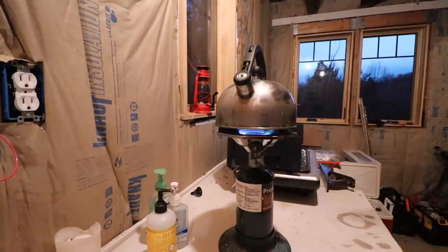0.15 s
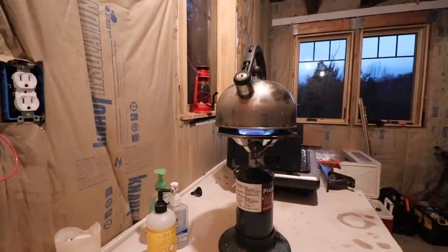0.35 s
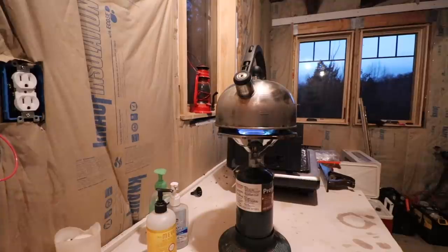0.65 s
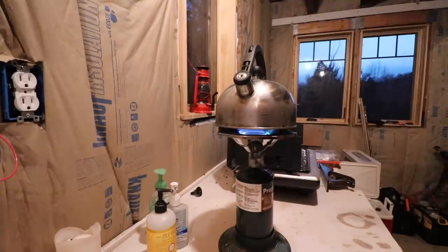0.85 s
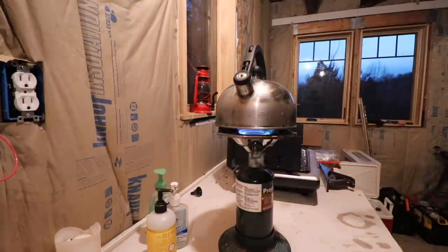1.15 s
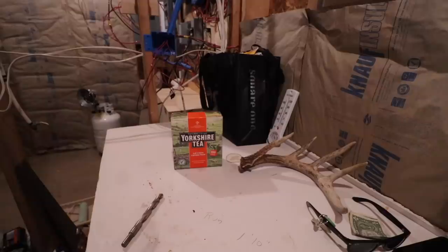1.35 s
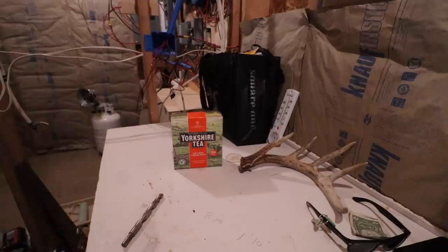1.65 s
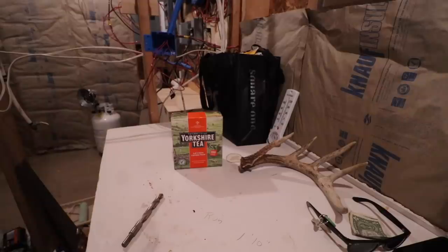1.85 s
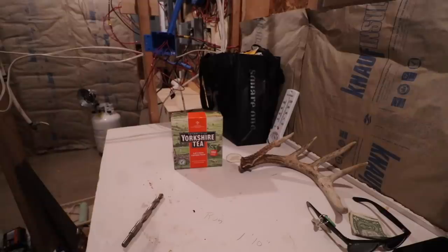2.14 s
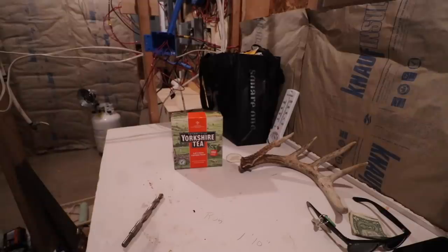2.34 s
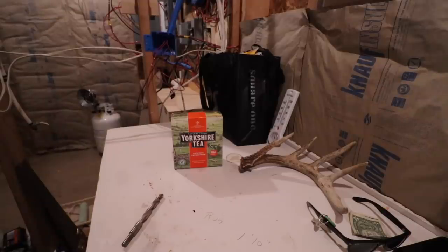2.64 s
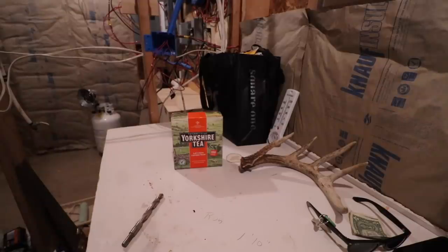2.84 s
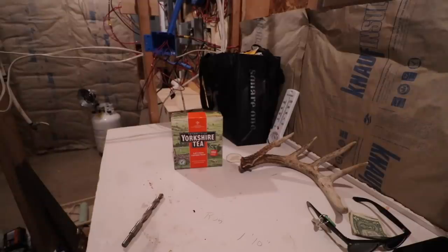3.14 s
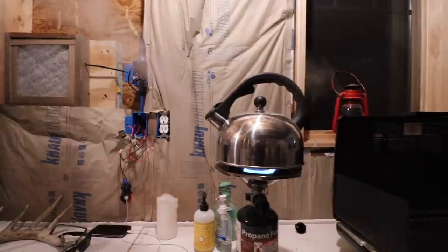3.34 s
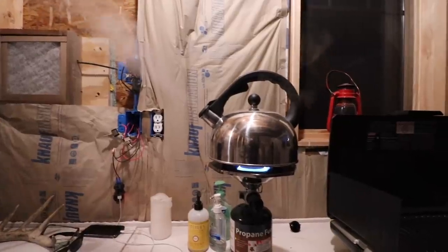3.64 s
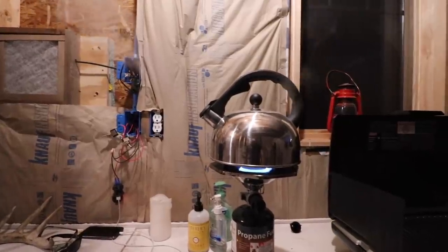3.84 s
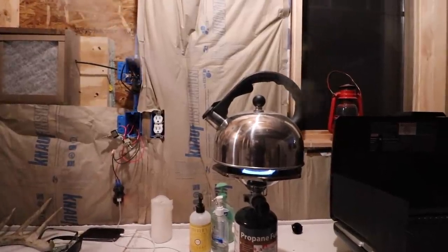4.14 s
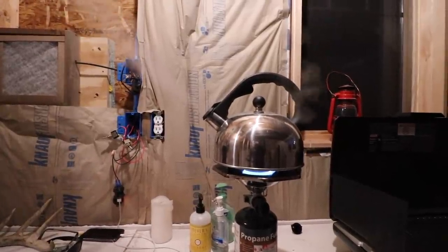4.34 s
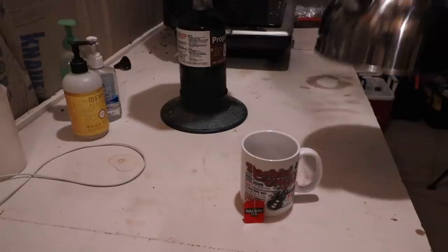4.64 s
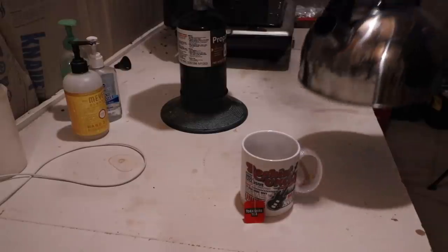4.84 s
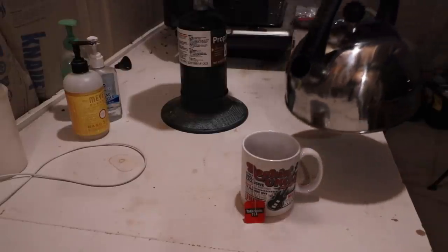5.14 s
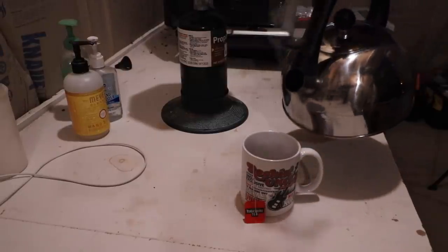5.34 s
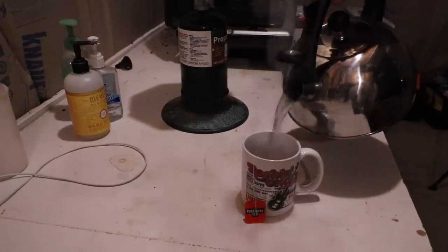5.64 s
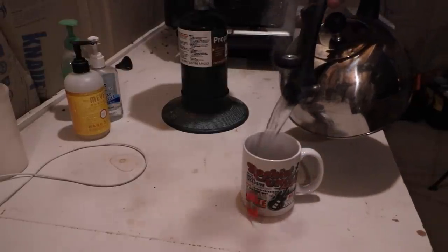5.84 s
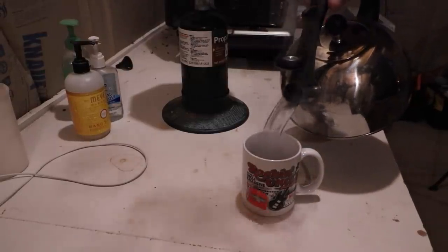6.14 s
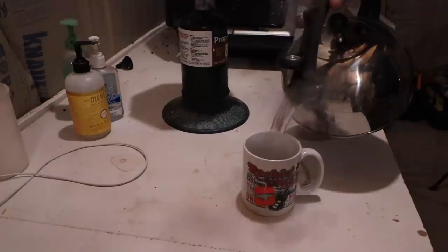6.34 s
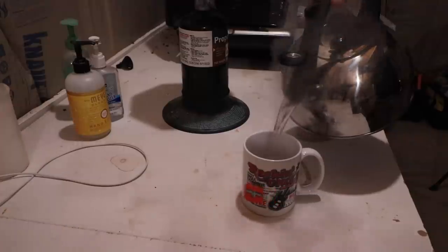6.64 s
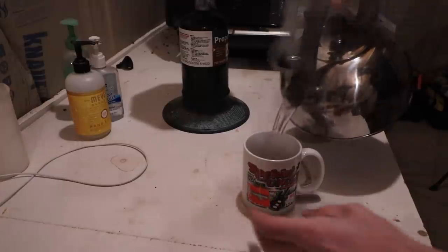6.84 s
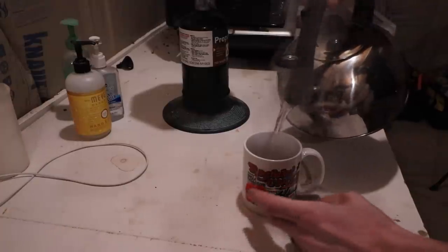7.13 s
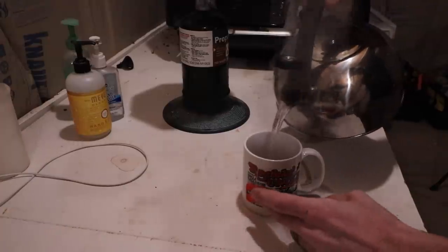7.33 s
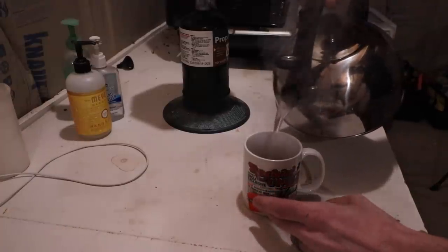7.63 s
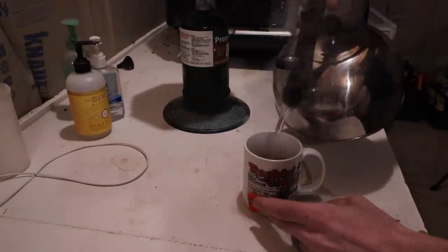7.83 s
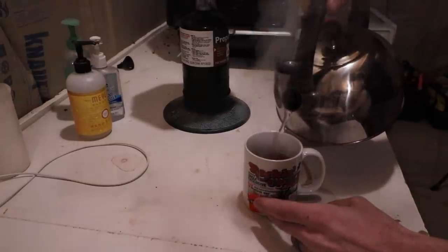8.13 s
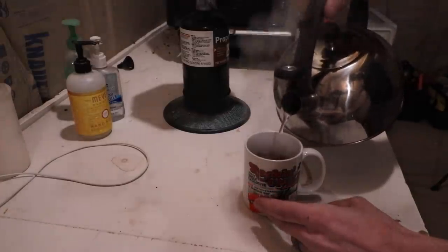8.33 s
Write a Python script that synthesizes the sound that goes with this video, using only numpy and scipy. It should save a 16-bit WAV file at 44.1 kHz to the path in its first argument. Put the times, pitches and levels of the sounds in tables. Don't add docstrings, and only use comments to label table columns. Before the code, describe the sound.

A gas camp burner roars under a steel kettle, the kettle whistles shrilly, then boiling water hisses and pours bubbling into a mug.

```python
import sys
import numpy as np
from scipy import signal
from scipy.fft import rfft, irfft, next_fast_len
from scipy.io import wavfile
from scipy.ndimage import uniform_filter1d, map_coordinates

SR = 44100
rng = np.random.default_rng(int(sys.argv[2]) if len(sys.argv) > 2 else 0)


def volts_from_decibels(level):
    exponent = np.asarray(level, float) / 20
    return 10 ** exponent


def log_audio(samples):
    frames = np.atleast_2d(samples).T
    limited = np.clip(frames, -1, 1)
    pcm = np.round(limited * 32767).astype(np.int16)
    wavfile.write(sys.argv[1], SR, pcm)


N = 373968
TIME = np.arange(N) / SR

CUTS = [
    1.325,
    3.333,
    4.692,
]

# pitch_hz, left-right likeness (0 to 1)
ALIKE = [
    [(100, 1), (700, 0.92), (1800, 0.4), (3000, 0.6), (5500, .36), (12000, 0.12)],
    [(100, 1), (700, 0.95), (1800, 0.52), (4000, 0.28), (12000, 0.17)],
    [(100, 0.998), (700, 0.98), (1900, 0.82), (3100, 0.44), (5300, 0.88), (10000, 0.42)],
    [(100, 0.65), (700, 0.68), (2050, 0.2), (3000, 0.5), (8000, 0.22), (14000, .6)],
]
# pitch_hz, left_minus_right_db
TILT = [
    [(60, -0.5), (180, 0), (550, -0.5), (1650, -1.5), (4970, -2), (15000, 1.5)],
    [(60, -2.5), (180, 0), (550, -0.5), (1650, -2), (4970, -8.5), (15000, 1)],
    [(60, 1), (180, -0.5), (550, 0.5), (1650, -2.5), (4970, 0), (15000, 5.5)],
    [(60, 1), (180, -1), (550, 1.5), (1650, -3.5), (4970, -0.5), (15000, -2.5)],
]
LAG_MS = [0.02, 0.19, 0.005, 0.043]
BASS_TWIST = [.16, .1, 0, .18]

BURNER_DB = [-39, -38, -47]
# pitch_hz, level_db (per Hz)
NEAR = [(15, -48), (25, -18), (119, 3), (323, 1.5), (434, -9.5), (922, -13), (1800, -22.5), (3100, -20.5),
        (6200, -21.5), (8800, -31), (10700, -46), (12000, -28), (13100, -38), (15000, -31), (15700, -52)]
# pitch_hz, width_hz, level_db
NEAR_PEAKS = [(505, 28, -9.5), (720, 66, -6.5), (880, 120, -8.5), (3750, 40, -12), (5330, 60, -11.5),
              (5540, 110, -13), (6600, 150, -29.5), (7370, 146, -18.5), (7800, 280, -16.5),
              (8200, 380, -16), (9750, 150, -18), (11660, 210, -23)]
# pitch_hz, level_db (per Hz)
ASIDE = [(15, -43), (25, -19.5), (122, -0.5), (260, 0.5), (470, -15.5), (900, -21.5), (1600, -24.5),
         (2800, -23), (5800, -28.5), (6600, -32.5), (9000, -30), (10900, -51.5), (13000, -44), (15300, -37),
         (15700, -44.5)]
# pitch_hz, width_hz, level_db
ASIDE_PEAKS = [(397, 12, -10), (566, 76, -3.5), (679, 114, -0.5), (890, 44, -8.5), (1313, 68, -15),
               (3360, 62, -22), (1200, 31, -10), (3886, 115, -12), (4454, 290, -16.5), (5150, 73, -18),
               (5510, 66, -16), (5820, 250, -17.5), (6820, 56, -22.5), (7180, 100, -22), (7840, 250, -14.5),
               (10200, 170, -26.5), (12020, 140, -23.5)]
# pitch_hz, level_db (per Hz)
BOIL = [(25, -43.5), (100, -20), (300, -26.5), (700, -13.5), (1700, -25.5), (4100, -18.5), (4500, -4.5),
        (4800, -4.5), (5200, -10), (6000, -20.5), (8000, -19.5), (10300, -27.5), (13000, -35),
        (13900, -48.5), (15700, -62)]
# pitch_hz, width_hz, level_db
BOIL_PEAKS = [(139, 23, -5), (230, 25, -2), (295.5, 37, -3), (487, 23, -8), (580, 23, -10.5),
              (716, 19, -5.5), (1300, 60, -11), (1440, 60, -12), (1900, 40, -11), (2210, 230, -12),
              (3770, 170, -9.5)]
# start_s, level_db, half_length_s
FLARE = (3.83, 5.1, 0.054)
# start_s, level_db, half_length_s, pitch_hz, width_hz
RUSTLE = (1.425, -53, .06, 2300, 1500)

# start_s, pitch_hz, jet_edge_db
WHISTLE = [(3.34, 4362, 3), (3.46, 4429, 1.5), (3.63, 4365, 2.5), (3.82, 4422, -1.5), (3.96, 4383, -1.5),
           (4.1, 4400, -1), (4.33, 4404, 0.5), (4.41, 4360, -2), (4.685, 4420, 3)]
# start_s, depth_db, jump_hz
FALTERS = [(3.427, 5.5, 11), (3.46, 6, 9.5), (3.482, 3.5, 1.5), (3.538, 3.5, 5.5), (3.675, 3.5, 3.5),
           (3.712, 3, 0.5), (3.748, 7, 16.5), (3.79, 1.5, 6), (3.817, 9, 16.5), (3.851, 1, -11.5),
           (3.925, 2.5, -5.5), (3.977, 4, 24), (4.006, 0.5, 0), (4.068, 5, 22.5), (4.221, 5.5, 32),
           (4.11, 1, 1.5), (4.245, 0.5, -5), (4.305, 6, 21.5), (4.401, -1.5, -16.5), (4.53, 1.5, -5.5),
           (4.614, 3, 31), (4.64, 4, 0.5), (4.663, 9.5, 2)]
# start_s, depth_db, half_length_s
LULLS = [(3.385, 1.5, 0.037), (3.452, 2, 0.018), (3.557, 1.5, .012), (3.693, 0.5, 0.023), (4.034, 3, 0.018),
         (4.232, 1, .015), (4.383, 3.5, .011), (4.407, 4.5, .012), (4.565, 2.5, .018)]
# start_s, level_db, half_length_s
CHIRPS = [
    (3.814, -47, .006),
    (3.921, -38, .011),
]
# start_s, note_left_minus_right_db, overtones_left_minus_right_db
LEAN = [(3.34, 1, 7), (3.6, .7, 5.5), (3.85, -.6, 6), (3.98, 3.2, 8), (4.12, 2, -1), (4.3, 3.2, -2),
        (4.69, 3.4, 3)]
WHISTLE_DB, OCTAVE_DB, LOW_NOTE_DB = -24, -20.5, -61
GAP_S, SAG_S, SAG_SHARE = 0.0035, 0.015, 0.23
SETTLE_S = 0.04
OCTAVE_GAIN, LOW_GAIN = 1.7, 3
ECHO = 0.035

# pitch_hz, level_db (per Hz)
STEAM = [(15, -56), (25, -12), (59, -7.5), (193, -5.5), (260, -6), (496, -8), (851, -9), (1500, -11.5),
         (1620, -13), (2430, -20), (3180, -8.5), (9860, -8.5), (15600, -24)]
# pitch_hz, width_hz, level_db
STEAM_PEAKS = [(845, 51, -3.5), (1200, 17, -3.5), (1674, 15, -1), (1750, 60, -8.5), (2440, 195, -3),
               (2550, 35, -6), (2770, 48, -7), (2860, 15, -5), (3005, 14, -15)]
# start_s, level_db
HISS = [(4.69, -49.5), (5.57, -49), (5.84, -49), (6.05, -50), (6.28, -46.5), (6.66, -49.5), (7.49, -51),
        (8.48, -52.5)]
# start_s, level_db, fall_s
FIZZ = (4.99, -47, 0.28)
# pitch_hz, level_db (per Hz)
FIZZ_TONE = [(4500, -39), (7000, -4.5), (8500, -0.5), (10000, -2.5), (13000, -15), (15600, -23.5)]

# start_s, level_db, fall_s
SLOSHES = [
    (5.28, -40, 0.094),
    (5.512, -36.5, 0.11),
    (5.6, -38, 0.092),
]
# pitch_hz, level_db (per Hz)
SPATTER = [(300, -30), (700, -11.5), (1600, -0.5), (2150, -10), (2450, -1), (3900, -3), (5000, -9),
           (6500, -10), (9000, -4.5), (12000, -12), (14000, -35)]
# pitch_hz, width_hz, level_db
SPATTER_PEAKS = [(1658, 40, 4), (2520, 150, 0), (2860, 40, 3.5), (3420, 110, -1.5), (3930, 160, 2)]
SLOSH_RISE, SHELL_DB = 0.53, -14

# start_s, level_db, pitch_hz
BUMPS = [(4.6893, -18.5, 287), (4.7009, -26.5, 225), (4.7075, -27, 225), (4.719, -39, 240),
         (4.7352, -27.5, 230), (4.7497, -34, 283), (4.7634, -28, 284), (4.7718, -31, 188),
         (6.66, -34.5, 350), (6.69, -42, 335), (6.759, -38, 323), (6.944, -40, 462), (6.954, -38, 398),
         (6.964, -46, 295)]
# start_s, level_db, fall_s
THRUM = [
    (6.7, -55.5, 0.3),
    (6.96, -51, 0.04),
    (7.6, -60.5, 0.32),
]

# start_s, pitch_hz
COLUMN = [(5.7, 740), (6.2, 836), (6.6, 1050), (7.0, 1300), (7.5, 1640), (8.3, 1630)]
# start_s, level_db, fall_s, spray_over_bubbles_db
GLUGS = [(5.84, -59.5, 0.039, 13.5), (6.08, -51, .03, 7.5), (6.14, -46, 0.022, -0.5),
         (6.239, -41.5, 0.036, 4.5), (6.35, -40, 0.081, 0.5), (6.49, -45.5, 0.083, -2),
         (6.585, -41, 0.019, -9), (6.66, -46, 0.048, -16), (6.745, -47.5, 0.029, -4),
         (6.948, -46.5, 0.025, -6.5), (7.0, -52, 0.02, -15.5), (7.535, -52.5, 0.043, -15),
         (7.605, -45, .015, -15), (7.65, -53.5, 0.033, -15), (7.79, -54, .03, -10)]
# start_s, level_db, pitch_hz
PLOPS = [(5.796, -50, 820), (5.824, -42, 780), (5.839, -37, 796), (5.856, -44.5, 816), (6.079, -37.5, 1610),
         (6.123, -32.5, 845), (6.136, -31.5, 850), (6.218, -35, 901), (6.2315, -26, 890), (6.253, -36, 930),
         (6.2848, -24, 666), (6.314, -35.5, 972), (6.339, -26.5, 960), (6.367, -28, 966), (6.438, -38, 930),
         (6.475, -33, 980), (6.5765, -29, 1200), (6.599, -32.5, 820), (6.653, -45, 1100), (6.672, -33, 960),
         (6.749, -37, 680), (6.9335, -38.5, 1230), (6.9435, -34, 800), (7.053, -38.5, 1630),
         (7.5025, -36.5, 1660), (7.522, -37, 1680), (7.589, -35.5, 1390), (7.6525, -34, 1658),
         (7.774, -35, 1690), (8.186, -36.5, 1700), (6.108, -41, 773), (6.191, -48, 977), (6.207, -32, 990),
         (6.348, -32.5, 1360), (6.376, -38, 1165), (6.411, -41, 961), (6.451, -32.5, 853),
         (6.498, -36, 1020), (6.506, -35.5, 1150), (6.52, -41, 1000), (6.528, -37, 900),
         (6.585, -31.5, 1230), (6.832, -38.5, 1490), (6.858, -41.5, 1440), (6.905, -37.5, 1650),
         (6.99, -38.5, 1250), (7.077, -40, 1600), (7.121, -41, 1360), (7.386, -40, 1620),
         (7.465, -37.5, 1810), (7.484, -44, 1700), (7.567, -39, 1650), (7.635, -39.5, 1660),
         (7.749, -38.5, 1630), (7.993, -45, 1290), (6.242, -34.5, 970), (6.92, -41, 1200),
         (7.511, -38.5, 1650), (7.544, -40, 1750), (7.663, -38.5, 1680)]
# start_s, level_db, pitch_hz
SPLATS = [(5.2904, -46, 2420), (5.6478, -40, 3420), (5.826, -34.5, 2590), (5.8383, -33.5, 4300),
          (5.855, -36, 2600), (5.99, -35, 4300), (6.0843, -31, 3010), (6.2183, -22.5, 2490),
          (6.237, -35, 2710), (6.327, -31, 3140), (6.34, -36.5, 2930), (6.368, -30, 3060),
          (6.3838, -29, 2800), (6.4124, -32, 3200), (6.4587, -32.5, 4140), (6.548, -37, 2940),
          (6.636, -35, 4110), (6.7361, -36.5, 2890), (6.7696, -34.5, 2860), (6.0553, -43.5, 2220),
          (6.0693, -36, 4170), (6.0765, -37, 4070), (6.1075, -33.5, 4370), (6.133, -41, 3080),
          (6.1826, -40, 2800), (6.2623, -37, 2520), (6.2864, -34, 2460), (6.28, -34, 4340),
          (6.307, -41, 2300), (6.32, -37.5, 4680), (6.3135, -33, 2980), (6.345, -33.5, 4500),
          (6.357, -36.5, 2750), (6.379, -36.5, 3180), (6.423, -36, 3300), (6.451, -37, 3010),
          (6.6645, -46, 2550), (6.7233, -39.5, 2380)]
# start_s, level_db, pitch_hz
TICKS = [(5.8384, -33.5, 7150), (6.2164, -37, 7460), (6.2302, -30.5, 7200), (6.3676, -30, 5400),
         (6.4268, -28.5, 8200), (6.543, -34, 6180), (6.5884, -36, 8350), (6.7356, -31, 7040),
         (6.1075, -32.5, 6150), (6.1883, -38, 6300), (6.2118, -31.5, 8290), (6.3116, -39, 7300),
         (6.342, -34, 7020), (6.4577, -33, 7060), (6.5206, -35, 6960), (6.545, -31.5, 10500),
         (6.9032, -39.5, 9030), (6.9755, -32, 8560), (6.9965, -37, 8640)]
# start_s, level_db
POPS = [(6.1242, -30), (6.1348, -35), (6.2197, -20), (6.2209, -24), (6.3408, -23), (6.369, -28),
        (6.4127, -30), (6.4765, -33), (6.5782, -29), (6.648, -33), (6.6546, -35), (6.6732, -31),
        (6.7506, -30), (6.9063, -38), (6.9357, -33), (6.9461, -36), (6.9583, -34), (6.9915, -36),
        (7.3596, -39), (7.3872, -35), (7.4672, -39), (7.5907, -36), (7.7752, -38), (7.9953, -40)]
# start_s, level_db, pitch_hz
SNAP = (6.7362, -21, 12500)
GLUG_RISE, TRICKLE_DB, MIST_DB = 1, -51.5, -56.5
PLOP_T60, SPLAT_T60, TICK_T60, BUMP_T60 = 0.0085, 0.0053, 0.0049, 0.027
EMPTY_T60, FOAM_S = 0.041, 6.48
FULL_T60, FULL_S = 0.0096, 6.6
EVENT_DELAY_S = 0.001195
POP_HZ, POP_T60, POP_DB = 2000, 0.0018, 3.5


def unit(x):
    return x / np.sqrt(np.mean(x ** 2) + 1e-20)


def along(points, hz):
    f, v = np.transpose(points)
    return np.interp(np.log(hz + 1), np.log(f + 1), v)


def curves(rows):
    s, *cols = np.transpose(rows)
    return [np.interp(TIME, s, c) for c in cols]


def wobble(rate):
    coarse = TIME[::16]
    knots = rng.standard_normal(int(N * rate / SR) + 4)
    return np.interp(TIME, coarse, map_coordinates(knots, [coarse * rate]))


def bell(s, half):
    return np.exp(-((TIME - s) / half) ** 2)


def between(start, end, fade):
    opening = np.clip((TIME - start) / fade + .5, 0, 1)
    return opening * np.clip((end - TIME) / fade + .5, 0, 1)


def filtered(x, response):
    m = next_fast_len(N + 8192)
    return irfft(rfft(x, m) * response(np.fft.rfftfreq(m, 1 / SR)), m)[..., :N]


def apart(view):
    side = np.array([[.5], [-.5]])

    def response(hz):
        lag = 2 * np.pi * hz * LAG_MS[view] / 1000 + BASS_TWIST[view] / (1 + (hz / 1500) ** 2)
        return volts_from_decibels(side * along(TILT[view], hz)) * np.exp(-1j * side * lag)

    return response


def rush(white, spectrum, peaks, view, ripple_db):
    knots = rng.standard_normal((3, 500))
    m = next_fast_len(N)
    hz = np.fft.rfftfreq(m, 1 / SR)
    ringing = sum(volts_from_decibels(2 * db) / (1 + (2 * (hz - c) / w) ** 2) for c, w, db in peaks)
    power = volts_from_decibels(2 * along(spectrum, hz)) + ringing
    shared, left, right = [np.interp(hz / 32, np.arange(500), k) for k in knots]
    comb = volts_from_decibels(ripple_db * hz / (hz + 1200) * (shared + np.array([left, right])))
    colour = np.sqrt(power) * comb * apart(view)(hz)
    turn = np.arccos(np.clip(along(ALIKE[view], hz), 0, 1)) / 2
    a, b = rfft(white, m)
    left = np.cos(turn) * a + np.sin(turn) * b
    right = np.cos(turn) * a - np.sin(turn) * b
    return unit(irfft(colour * [left, right], m)[:, :N])


def patchy(depth_db):
    z = signal.stft(rng.standard_normal((2, N + 512)), nperseg=512)[2]
    field = uniform_filter1d(rng.standard_normal(z.shape[1:]), size=6, axis=0)
    field = uniform_filter1d(field, size=8, axis=1)
    return unit(signal.istft(z * volts_from_decibels(depth_db * unit(field)), nperseg=512)[1][:, :N])


def blips(rows, attack, rise, order=1):
    s, db, hz, t60 = np.transpose(rows)[..., None]
    t = np.arange(int(min(np.max(t60) * .7, .04) * SR)) / SR
    swell = (1 - np.exp(-t / attack)) ** order
    swing = np.sin(2 * np.pi * hz * t * (1 + rise * t / t60))
    wave = -volts_from_decibels(db - 60 * t / t60) * swell * swing
    at = (s * SR).astype(int) + np.arange(len(t))
    return np.bincount(at.ravel(), wave.ravel(), N + SR)[:N]


def lasting(rows, t60):
    return [(s + EVENT_DELAY_S, db, hz, t60) for s, db, hz in rows]


def scattered(rows):
    draw = rng.random((len(rows), 2, 2))
    return [(s + .0045 * late, db - 3, hz * np.exp(.5 * (off - .4)), t60)
            for (s, db, hz, t60), pair in zip(rows, draw) for late, off in pair]


def swarm(span, pitch, count, spread, scatter_db, cycles, attack):
    draw = rng.standard_normal((count, 3))
    s = np.sort(rng.uniform(*span, count))
    hz = np.interp(s, *np.transpose(pitch)) * np.exp(spread * draw[:, 0])
    hz = np.clip(hz, 200, 15000)
    t60 = cycles / hz * np.exp(0.16 * np.clip(draw[:, 2], -2, 2))
    x = blips(np.transpose([s, scatter_db * draw[:, 1], hz, t60]), attack, rise=0.067)
    return x / np.std(x[x != 0])


def surges(s, db, fall, rise):
    late = TIME[::32] - np.array(s)[:, None]
    width = np.array(fall)[:, None] * np.where(late < 0, rise, 1)
    power = np.sum(volts_from_decibels(2 * np.array(db)[:, None]) * np.exp(-2 * (late / width) ** 2), axis=0)
    return np.interp(TIME, TIME[::32], np.sqrt(power))


def walls(x, t60):
    t = np.arange(SR // 6) / SR
    tail = rng.standard_normal((2, len(t))) * volts_from_decibels(-60 * t / t60) * (t > .003)
    return signal.oaconvolve(x[None], tail / np.linalg.norm(tail[0]), axes=1)[:, :N]


def burner():
    gas = patchy(depth_db=.3)
    flame = unit(gas * volts_from_decibels(.15 * wobble(9) + 1.3 * wobble(90)))
    jet = unit(gas * volts_from_decibels(0.2 * wobble(15) + 0.52 * wobble(60)))
    white = jet + filtered(flame - jet, lambda hz: hz < 1700)
    s, db, half = FLARE
    white = white * volts_from_decibels(db * bell(s, half))
    edges = [-1, *CUTS]
    views = [(NEAR, NEAR_PEAKS), (ASIDE, ASIDE_PEAKS), (BOIL, BOIL_PEAKS)]
    roar = 0
    for view, (spectrum, peaks) in enumerate(views):
        gate = volts_from_decibels(BURNER_DB[view]) * between(edges[view], edges[view + 1], fade=0.0086)
        roar = roar + gate * rush(white, spectrum, peaks, view, ripple_db=2.3)
    return roar


def rustle():
    s, db, half, hz, width = RUSTLE
    noise = filtered(rng.standard_normal((2, N)), lambda f: np.exp(-((f - hz) / width) ** 2))
    return volts_from_decibels(db) * bell(s, half) * unit(noise)


def steam():
    white = patchy(depth_db=1.0) * volts_from_decibels(0.34 * wobble(8) + 0.7 * wobble(40))
    level = volts_from_decibels(curves(HISS)[0] + 5) * between(CUTS[2], 9, fade=0.011)
    return level * rush(white, STEAM, STEAM_PEAKS, view=3, ripple_db=1.5)


def fizz():
    s, db, fall = FIZZ
    level = between(CUTS[2], 9, fade=.011) * surges([s], [db], [fall], rise=1.4)
    return level * rush(patchy(depth_db=3.0), FIZZ_TONE, [], view=3, ripple_db=-2.0)


def table():
    dry = volts_from_decibels(13) * blips(lasting(BUMPS, BUMP_T60), attack=0.006, rise=-0.12, order=2)
    higher = [(s + .003, db, 1.62 * hz, .03) for s, db, hz in BUMPS[1:8]]
    upper = volts_from_decibels(-6.5) * blips(higher, attack=0.0041, rise=-.05)
    return dry + upper + volts_from_decibels(-10) * walls(dry, t60=.1)


def thrum():
    gurgles = swarm((6.3, 8.2), [(6.5, 420), (7.5, 180)], count=300, spread=0.53, scatter_db=0.5,
                    cycles=2.3, attack=0.0006)
    return surges(*np.transpose(THRUM), rise=0.63) * gurgles


def sizzle():
    pops = (rng.random((1, N)) < .03) * rng.exponential(.7, (1, N))
    white = patchy(depth_db=1.0) * (1 + pops) * volts_from_decibels(.5 * wobble(30) + 1.0 * wobble(80))
    level = surges(*np.transpose(SLOSHES), SLOSH_RISE)
    return level * rush(white, SPATTER, SPATTER_PEAKS, view=3, ripple_db=2.0)


def faltering():
    t = np.arange(3.3, 4.8, .0005)
    s, depth, hz = np.transpose(FALTERS)[..., None]
    gap_db = np.sum(depth * np.exp(-((t - s) / GAP_S) ** 2), axis=0)
    sag_db = SAG_SHARE * np.sum(depth * np.exp(-((t - s) / SAG_S) ** 2), axis=0)
    jump_hz = np.sum(hz * (t > s) * np.exp(-abs(t - s) / SETTLE_S), axis=0)
    return [np.interp(TIME, t, c, 0, 0) for c in (gap_db, sag_db, jump_hz)]


def spout_low_note(sag_db):
    narrow = unit(filtered(rng.standard_normal((2, N)), lambda hz: 1 / (1 + (hz / 55) ** 2)))
    stirred = volts_from_decibels(LOW_NOTE_DB + LOW_GAIN * sag_db)
    stirred = stirred + volts_from_decibels(SHELL_DB) * surges(*np.transpose(SLOSHES), SLOSH_RISE)
    low = stirred * (narrow[0] + 1j * narrow[1]) * between(CUTS[1], 5.5, fade=.012)
    low = low + sum(volts_from_decibels(db) * bell(s, half) for s, db, half in CHIRPS)
    pitch_hz = np.interp(TIME, [4.6, 4.8, 5.5], [2470, 2420, 2480])
    return low * np.exp(2j * np.pi * np.cumsum(pitch_hz) / SR)


def whistle():
    pitch_hz, edge_db = curves(WHISTLE)
    pan_db, high_pan_db = curves(LEAN)
    gap_db, sag_db, jump_hz = faltering()
    pan_db = pan_db + 1.3 * wobble(28)
    lull_db = sum(db * bell(s, half) for s, db, half in LULLS)
    octave_db = OCTAVE_DB + OCTAVE_GAIN * sag_db + edge_db + 1.2 * wobble(14)

    shake_hz = 5 * wobble(35) + 5 * wobble(70) + 6 * wobble(200)
    phase = 2 * np.pi * np.cumsum(pitch_hz - 6 + jump_hz + shake_hz) / SR
    level_db = WHISTLE_DB + 0.27 * wobble(22) + 0.42 * wobble(110) - gap_db - sag_db - lull_db
    size = np.sqrt(2) * volts_from_decibels(level_db)
    breath = unit(filtered(rng.standard_normal(N), lambda hz: 1 / (1 + (hz / 240) ** 4)))
    breathy = 1 + volts_from_decibels(-23.5) * breath * volts_from_decibels(2.1 * wobble(18))
    opposite = np.array([[1], [-1]])
    lead = .14 * wobble(12) * opposite
    skew = (-.5 + .45 * wobble(30)) * opposite
    tone = size * breathy * np.sin(phase + lead)
    second = volts_from_decibels(octave_db + 2.65 * wobble(90)) * np.sin(2 * phase + skew)
    third = volts_from_decibels(-40 + 1.5 * wobble(60)) * np.sin(3 * phase + skew)
    overtones = size * breathy ** 3 * (second + third)

    low = spout_low_note(sag_db)
    sum_tone = volts_from_decibels(-3.0) * low * np.exp(1j * phase)
    difference_tone = volts_from_decibels(-9.5) * low.conj() * np.exp(2j * phase)
    dry = tone + (sum_tone + difference_tone).real
    echo = walls(dry[0], t60=.1)[0] * opposite
    wet = dry * volts_from_decibels([pan_db / 2, -pan_db / 2]) + ECHO * echo
    wet = wet + overtones * volts_from_decibels([high_pan_db / 2, -high_pan_db / 2])
    return wet * between(CUTS[1], CUTS[2] - .004, fade=0.011) + low.real * volts_from_decibels([[-2.2], [2.2]])


def stream():
    s, db, fall, spray_db = np.transpose(GLUGS)
    surge = surges(s, db, fall, GLUG_RISE)
    spray_surge = surges(s, db + spray_db, fall, GLUG_RISE)
    bubbles = swarm((5.7, 8.3), COLUMN, count=700, spread=0.083, scatter_db=3.5,
                    cycles=16, attack=0.00018)
    spray = swarm((5.78, 7.1), [(5.8, 2870), (6.4, 3060), (7.1, 3150)], count=1500, spread=0.11,
                  scatter_db=5.5, cycles=7, attack=.0001)
    crackle = swarm((5.78, 8), [(5.8, 1710), (6.9, 1280), (8, 1600)], count=1300, spread=0.46,
                    scatter_db=5.5, cycles=5.3, attack=.00008)
    bubbles = volts_from_decibels(-11.0) * (volts_from_decibels(TRICKLE_DB) + surge) * bubbles
    spray = volts_from_decibels(-8) * (volts_from_decibels(MIST_DB) + spray_surge) * spray
    return bubbles + spray + volts_from_decibels(-5) * surge * crackle


def large_bubbles():
    slaps = [(s + EVENT_DELAY_S, db, 2.2 * hz, .002) for s, db, hz in PLOPS]
    times, decays = [PLOPS[0][0], FOAM_S, FULL_S], [EMPTY_T60, PLOP_T60, FULL_T60]
    plops = [(s + EVENT_DELAY_S, db, hz, np.interp(s, times, decays)) for s, db, hz in PLOPS]
    ringing = volts_from_decibels(4.0) * blips(plops, attack=0.00062, rise=0.054)
    return ringing + volts_from_decibels(2.0) * blips(slaps, attack=.00005, rise=.01)


def drops():
    edges = [(s + EVENT_DELAY_S, db, 2.4 * hz, .0009) for s, db, hz in SPLATS]
    cracks = volts_from_decibels(-2.5) * blips(edges, attack=.00003, rise=.01)
    skins = [(s - 0.18 / POP_HZ, db + POP_DB, POP_HZ, POP_T60) for s, db in POPS]
    pops = blips(skins, attack=.00003, rise=-.3)
    snap = blips(lasting([SNAP], t60=.0004), attack=.00002, rise=.01)
    splats = lasting(SPLATS, SPLAT_T60)
    landing = splats + scattered(splats) + lasting(TICKS, TICK_T60)
    return cracks + pops + snap + volts_from_decibels(4.5) * blips(landing, attack=.0001, rise=0.00037)


def pour():
    dry = stream() + large_bubbles() + drops()
    dry = filtered(dry, lambda hz: hz ** 4 / (hz ** 4 + 450 ** 4))
    return filtered(dry, apart(view=3)) + volts_from_decibels(-3.5) * walls(dry, t60=0.086)


def scene():
    kettle = steam() + fizz() + sizzle() + whistle()
    return burner() + rustle() + kettle + table() + thrum() + pour()


def low_pass(x):
    return signal.sosfilt(signal.butter(12, 15730, fs=SR, output="sos"), x)


def record(dry):
    mix = filtered(dry, lambda hz: hz < 15730)
    return low_pass(mix)


dry = scene()
out = record(dry)
log_audio(out)
```